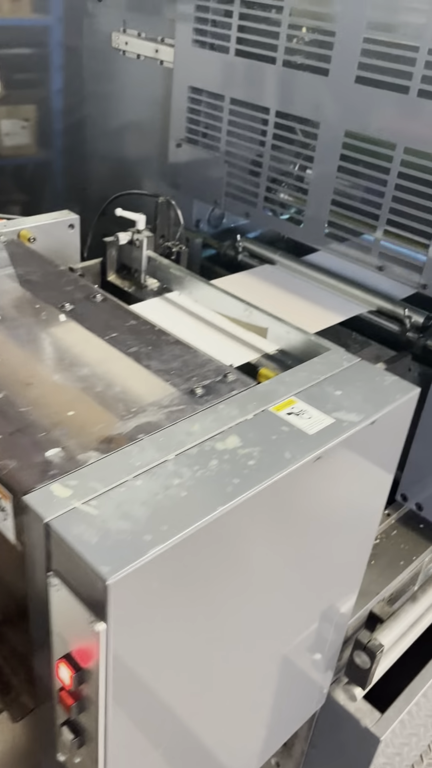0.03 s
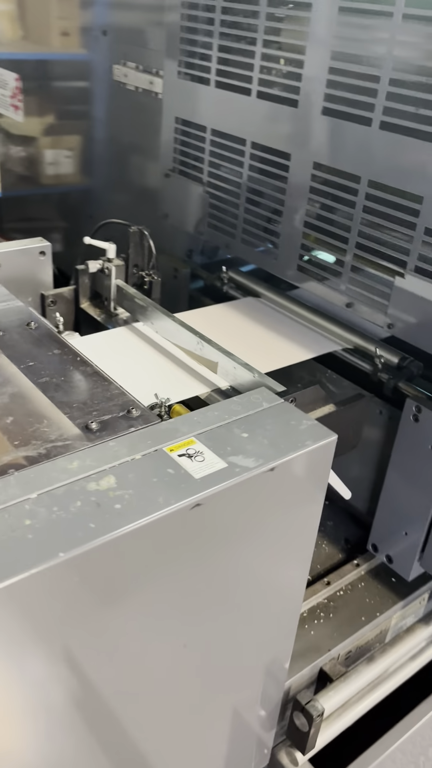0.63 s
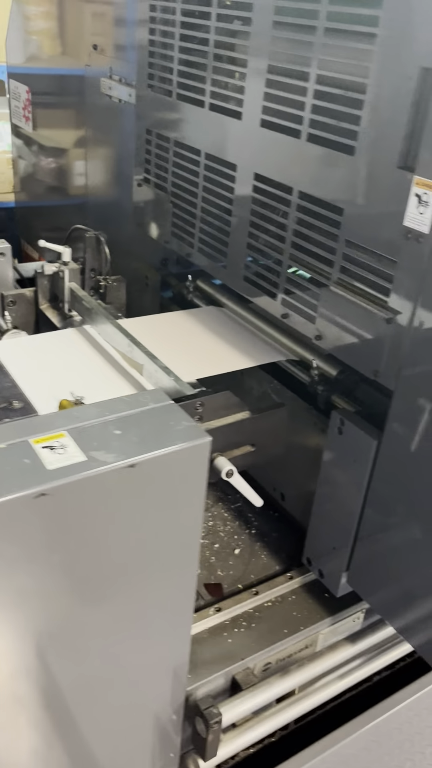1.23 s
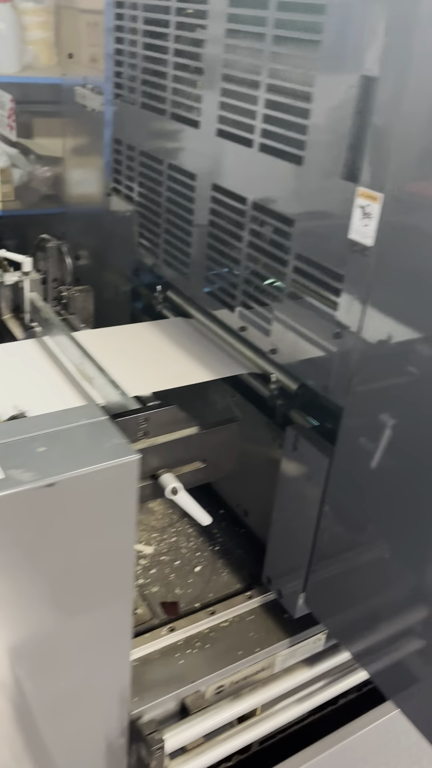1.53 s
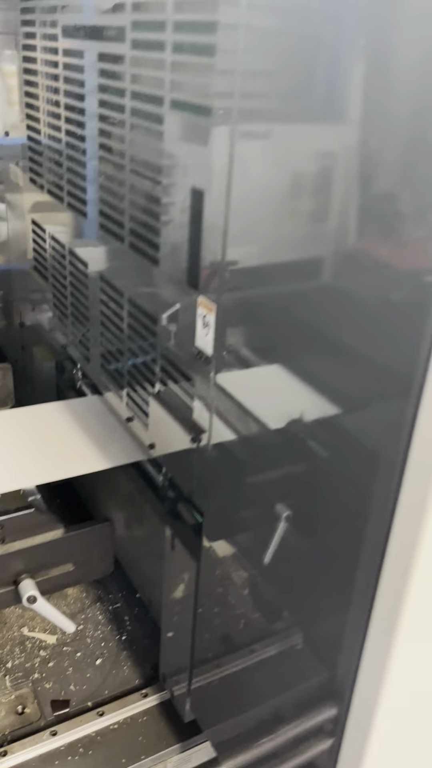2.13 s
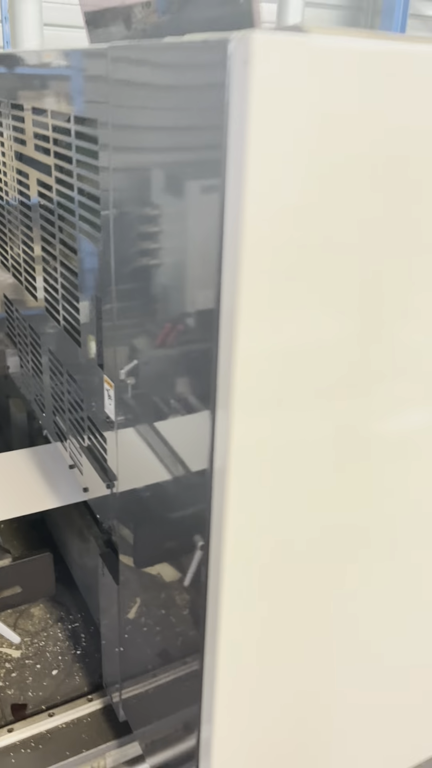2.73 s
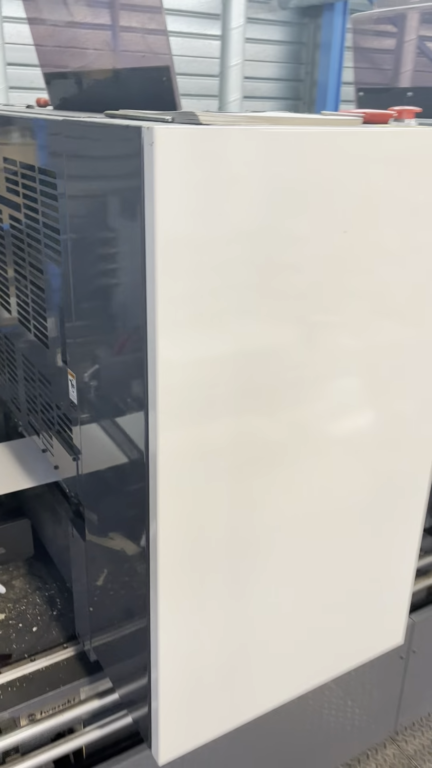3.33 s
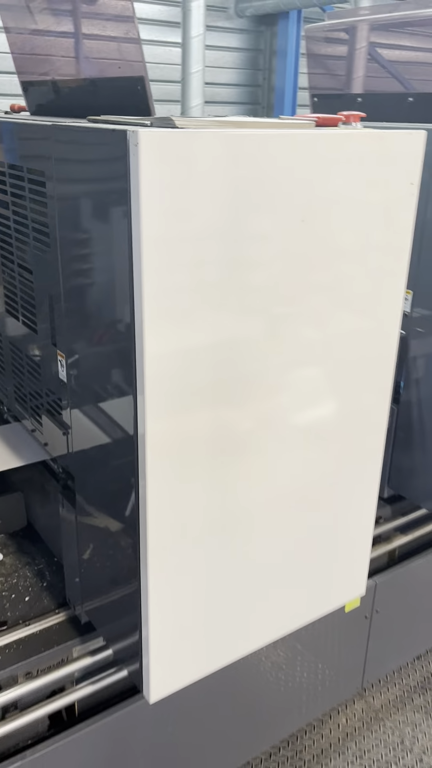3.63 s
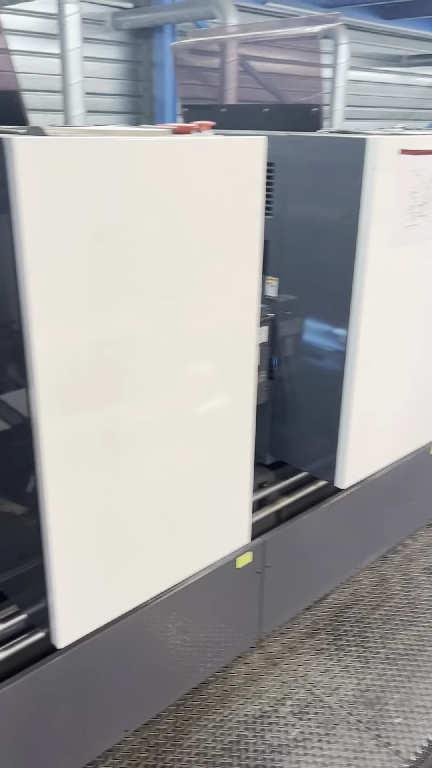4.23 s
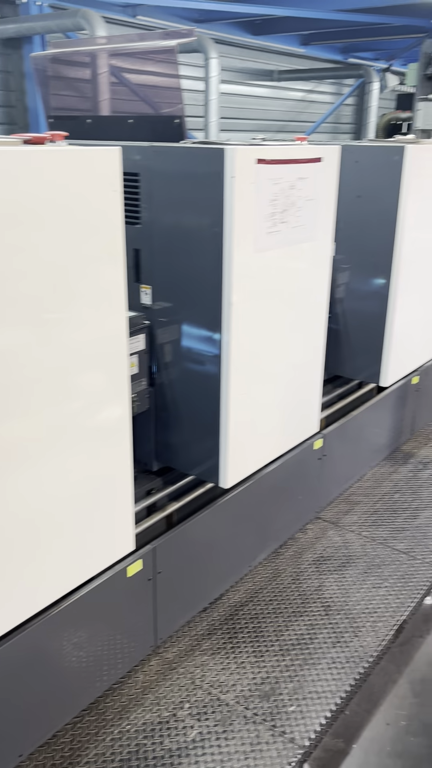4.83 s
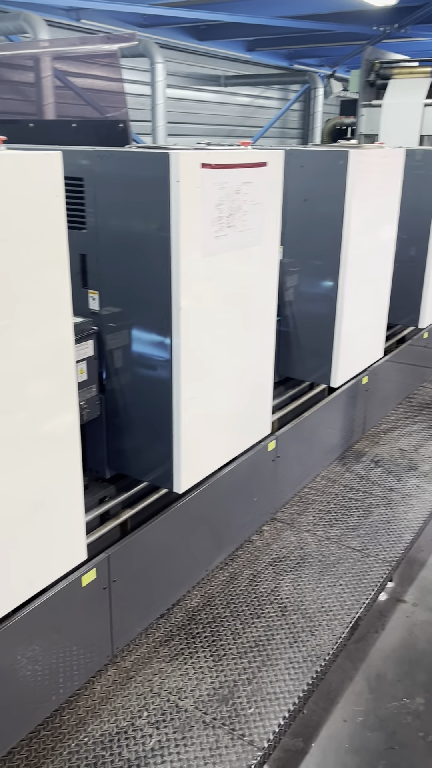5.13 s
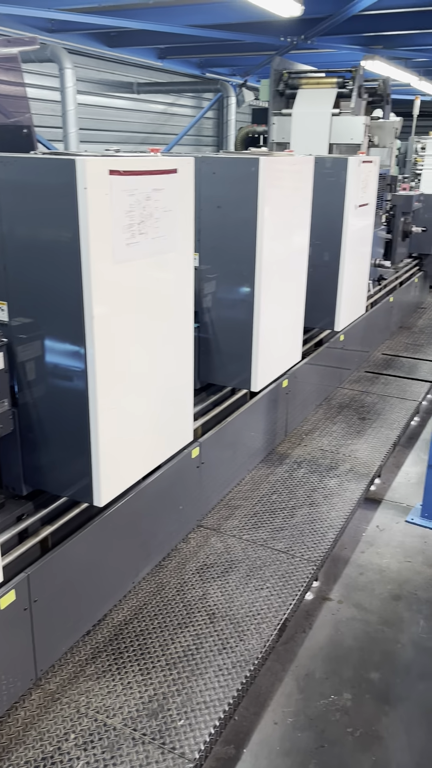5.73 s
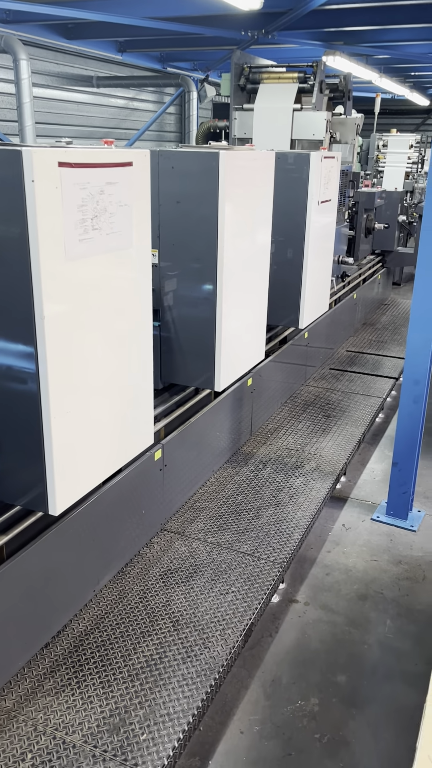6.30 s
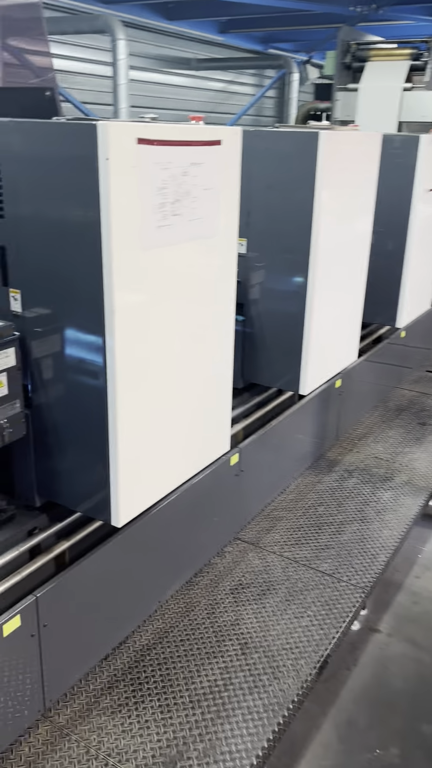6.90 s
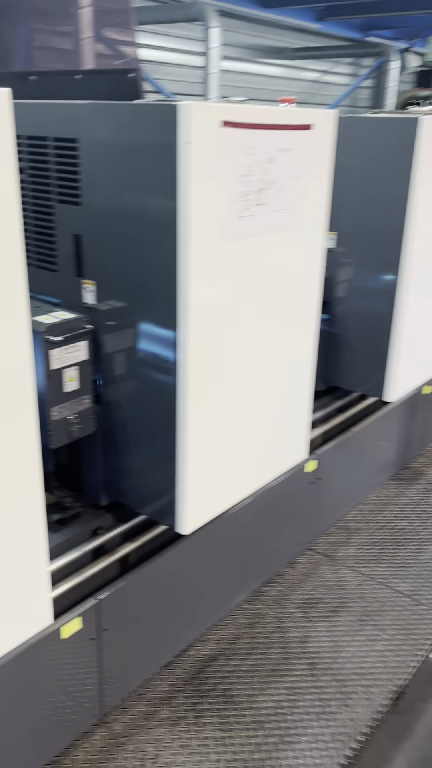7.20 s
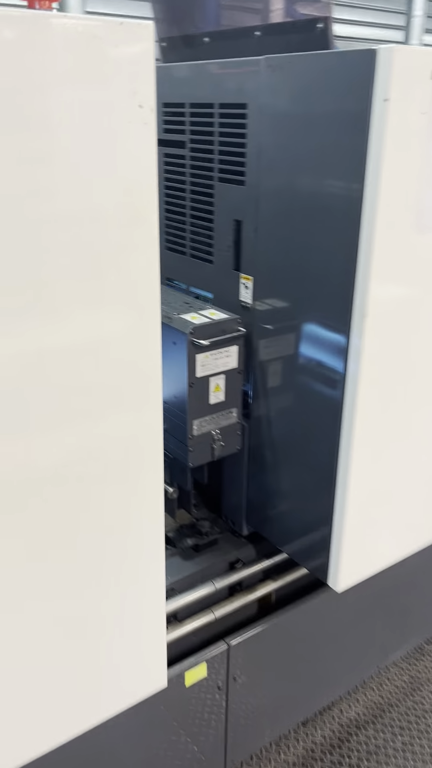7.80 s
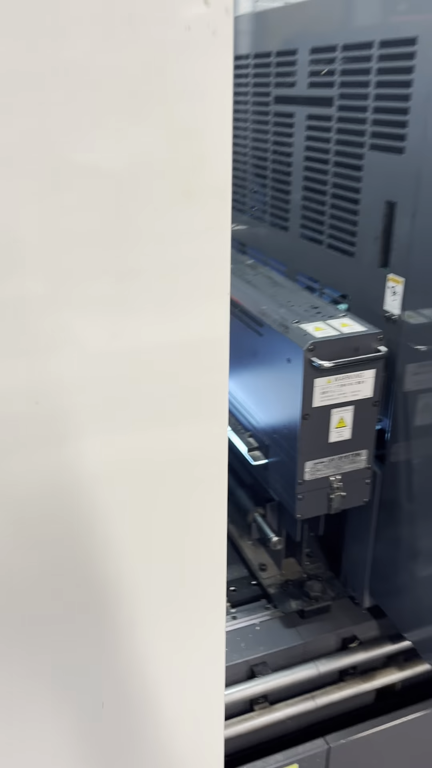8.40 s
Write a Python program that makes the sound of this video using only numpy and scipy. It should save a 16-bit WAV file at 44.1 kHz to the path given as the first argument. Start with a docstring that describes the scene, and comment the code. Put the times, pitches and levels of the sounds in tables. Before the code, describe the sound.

A large printing press runs in a hard-walled industrial hall, heard from a microphone carried along its side. Drives and blowers make a steady roar with a wavering whine, and each cycle adds a swish and two clacks. Close bursts of paper rasping and drumming are loudest at the start, around one second and just after three, with weaker ones later. Metal ticks, lever raps and dull roller knocks are scattered between them.

```python
"""A label press roars and whines in a hard-walled hall while a phone is carried along its printing units.
Drives and blowers make the roar and shake the panels, which sing as the phone passes them.
Every machine cycle brings a swish and two clacks; loose parts tick, levers rap and rollers knock.
On some strokes the web, the long strip of paper, is jerked back over its guides
and rasps and drums close by."""
import sys
import numpy as np
from scipy import signal
from scipy.fft import rfft, irfft, next_fast_len
from scipy.io import wavfile
from scipy.ndimage import uniform_filter1d

SR = 44100
rng = np.random.default_rng(int(sys.argv[2]) if len(sys.argv) > 2 else 0)


def file_out(sig):
    """Save sig as 16-bit WAV at sys.argv[1]."""
    # one column per channel
    cols = np.atleast_2d(sig).T
    # limit, then scale
    lim = np.clip(cols, -1, 1)
    pcm = np.round(lim * 32767).astype(np.int16)
    wavfile.write(sys.argv[1], SR, pcm)


N = 377055
T = np.arange(N) / SR
FFT_SIZE = next_fast_len(N)
FREQ = np.maximum(np.arange(FFT_SIZE // 2 + 1) * SR / FFT_SIZE, 1)
CYCLE_S = .75  # one machine cycle
RECEDE_DB_PER_S = 6.5  # the first unit's hiss and cam fade as the phone leaves it behind


def gain(db):
    """Turn decibels into a number to multiply by."""
    return 10 ** (np.asarray(db) / 20)


def normalise(x):
    """Scale a sound to an average power of 1."""
    return x / np.sqrt(np.mean(x ** 2))


def over_time(rows):
    """Join up a table's points in time: one curve for each later column."""
    times, *columns = np.transpose(rows)
    return [np.interp(T, times, column) for column in columns]


def over_pitch(rows):
    """Join up a table's points in frequency: one curve for each later column."""
    hz, *columns = np.transpose(rows)
    return [np.interp(np.log(FREQ), np.log(hz), column) for column in columns]


def filtered(x, response):
    """Give every frequency of a sound its own gain."""
    return irfft(rfft(x, FFT_SIZE) * response, FFT_SIZE)[..., :N]


def above(hz):
    """A filter that lets the frequencies above hz through."""
    return 1 / (1 + (hz / FREQ) ** 4)


def resonance(hz, width_hz):
    """A filter for a part that rings at one pitch."""
    return 1 / (1 + ((FREQ - hz) / width_hz * 2) ** 2)


def peaks(rows):
    """A filter that lifts or lowers several narrow bands."""
    return gain(sum(db * resonance(hz, width_hz) for hz, width_hz, db in rows))


def tiny_resonances(width_hz, depth_db):
    """Countless weak resonances of panels and hall make a slightly bumpy filter."""
    hz = np.arange(0, SR / 2, 10)
    bumps = normalise(signal.lfilter([1], [1, -np.exp(-10 / width_hz)], rng.standard_normal(len(hz))))
    return gain(depth_db * np.interp(FREQ, hz, bumps) * above(680))


def noise():
    """Two unrelated white noises: one for the direct sound, one for the sound the hall scatters."""
    return rng.standard_normal((2, N))


def coloured_noise(response):
    """Filtered noise with an average power of 1."""
    return normalise(filtered(noise(), response))


def ringing(colour, resonances=()):
    """The dense, noisy ring of a machine part."""
    return coloured_noise(gain(over_pitch(colour)[0]) * peaks(resonances))


def wander(rate_hz):
    """A smooth random drift, roughly between -1 and 1."""
    steps = rng.standard_normal(4096)
    drift = np.interp(T * rate_hz, np.arange(len(steps)), steps)
    return uniform_filter1d(drift, int(SR / rate_hz / 2)) * np.sqrt(2)


def grains(per_s, spread_db):
    """Two rows of tiny random impacts of uneven size."""
    hits = (rng.random((2, N)) < per_s / SR) * np.sign(noise())
    size_db = spread_db * np.minimum(rng.exponential(size=(2, N)), 3)
    return normalise(hits * gain(size_db))


def blows(times, levels_db, rise_s, ring_s, hall_db, hall_s):
    """Loudness of blows: a quick rise, then a ring and a hall echo that lose 60 dB in ring_s and hall_s."""
    t = T[:SR // 2]
    rise = 1 - np.exp(-t / rise_s)
    power = rise ** 2 * (gain(-60 * t / ring_s) ** 2 + gain(hall_db - 60 * t / hall_s) ** 2)
    total = np.zeros(N + len(t))
    for at_s, db in zip(times, levels_db):
        start = max(int((at_s - rise_s) * SR), 0)
        total[start:start + len(t)] += gain(db) ** 2 * power / power.max()
    return np.sqrt(total[:N])


def pulls(rows, swell_db):
    """Loudness of tugs that swell, hold and let go, plus the extra columns of the strongest tug."""
    rows = np.array(rows)
    start_s, swell_s, hold_s, fade_s, level_db = rows.T[:5, :, None]
    age_s = T - start_s
    rise_db = swell_db * np.clip(1 - age_s / swell_s, 0, 1)
    fall_db = 60 * np.maximum(age_s - swell_s - hold_s, 0) / fade_s
    each_db = np.where(age_s > 0, level_db - rise_db - fall_db, -np.inf)
    loudness = uniform_filter1d(gain(each_db.max(axis=0)), int(.006 * SR))  # soften the catch
    return loudness, *rows[each_db.argmax(axis=0), 5:].T


def each_cycle(at_s):
    """The times of something that happens once in every machine cycle."""
    return np.arange(at_s, N / SR, CYCLE_S)


# The roar along the phone's walk: time_s, rumble_db, middle_db, hiss_db
ROAR_ALONG_WALK = [(0.0, -25, -28, -34.5), (1.19, -27.5, -29, -36), (2.43, -26, -32, -38.5),
                   (3.36, -24.5, -30, -38.5), (3.76, -27.5, -33, -38.5), (6.55, -27, -33, -40),
                   (8.55, -25.5, -32, -38.5)]
def walk_db():
    """Rumble, middle and hiss rise and fall around their usual levels as the phone moves."""
    return [curve - np.median(curve) for curve in over_time(ROAR_ALONG_WALK)]


# Moments of hard work in every cycle: time_in_cycle_s, half_width_s, boost_db
DRIVE_LOADS = [(.082, 0.036, 1.5), (.245, 0.037, 0.5), (.40, 0.094, 2.5), (.69, 0.019, 1.23)]
def drive_effort_db():
    """The drives get a little louder each time they take a load."""
    from_load_s = lambda at_s: (T - at_s + CYCLE_S / 2) % CYCLE_S - CYCLE_S / 2
    return sum(db * np.exp(-(from_load_s(at_s) / width_s) ** 2) for at_s, width_s, db in DRIVE_LOADS)


# Tone colour of the drives and blowers: pitch_hz, level_db
ROAR_COLOUR = [(25, -124), (45, -65), (80, -59), (170, -53.5), (400, -53.5), (560, -56), (750, -59.5),
               (1200, -64), (1700, -67), (2400, -64.5), (3500, -71.5), (5000, -76), (9000, -84),
               (15500, -87.5)]
# Resonances of the housing: pitch_hz, width_hz, boost_db
HOUSING_RESONANCES = [(72.7, 16.7, 8), (94.9, 8.7, 10), (422.3, 24.2, 3.5), (496.4, 43, -1.5),
                      (518, 22, 2.5), (673.5, 28, 4.5), (824, 33.6, 6), (1202, 45, -2), (3720, 55, -1.5)]
def roar():
    """Rollers, gears and blowers rumble and hiss with the effort of the drives, with a fine rattle."""
    colour = gain(over_pitch(ROAR_COLOUR)[0]) * peaks(HOUSING_RESONANCES) * np.sqrt(SR / 2)
    colour *= tiny_resonances(width_hz=14, depth_db=1.3)
    rumble_db, middle_db, hiss_db = walk_db()
    effort_db = drive_effort_db()
    gear_ripple = np.sin(2 * np.pi * 14 * T / CYCLE_S)  # fourteen times a cycle
    flutter = wander(35)
    over_rumble, over_middle = above(554.6), above(2073)
    rumble = filtered(noise(), colour * (1 - over_rumble))
    rumble *= gain(rumble_db + effort_db + .84 * wander(20) - 1.46)
    middle = filtered(noise(), colour * (over_rumble - over_middle))
    middle *= gain(middle_db + .62 * effort_db + 1.014 * flutter - .16)
    rattle = normalise(noise() + .432 * grains(per_s=900, spread_db=.5))
    hiss = filtered(rattle, colour * over_middle)
    hiss *= gain(hiss_db + .39 * effort_db + 1.07 * flutter + .195 * gear_ripple - 1.34)
    return rumble + middle + hiss


# Panels and rollers, 6 dB quieter reach_s away: pitch_hz, width_hz, passed_at_s, reach_s, level_db
SINGING_PANELS = [(433.5, 48.5, 2.16, 0.36, -34), (324.5, 50, 3.35, 0.25, -34), (868, 102, 3.35, .5, -43),
                  (1057, 60, 4.06, 0.87, -43.5), (2027.6, 11.8, 5.87, 1.12, -47.5),
                  (2358, 34, 5.91, 0.96, -47.5), (536.6, 27.5, 7.31, .5, -37.5),
                  (673.5, 32.6, 7.64, 0.68, -38), (408.6, 32, 7.53, 0.04, -38.5),
                  (193.1, 12.6, 8.05, 0.5, -37.5)]
def panels():
    """Each unit's panels and rollers sing at their own pitch, swelling and fading as the phone passes."""
    shaking = noise()
    sound = np.zeros((2, N))
    for hz, width_hz, passed_at_s, reach_s, db in SINGING_PANELS:
        nearness = 1 / (1 + ((T - passed_at_s) / reach_s) ** 2)
        sound += normalise(filtered(shaking, resonance(hz, width_hz))) * gain(db) * nearness
    return sound


def tone(hz, db, fade_db, waver_hz):
    """A wavering tone that swells and fades as the phone crosses the hall's standing waves."""
    phase = 2 * np.pi * np.cumsum(hz + waver_hz * wander(12)) / SR
    rows = [np.sin(phase + wander(.37)) * gain(db + fade_db * wander(5.5)) for _ in range(2)]
    return np.sqrt(2) * np.array(rows)


# Loudness of the servo motor's whine and of the blower's blades: time_s, level_db
SERVO_LEVELS = [(0, -46), (.55, -42), (.85, -32.5), (1.15, -43), (1.35, -42), (1.55, -37.5), (1.78, -35.7),
                (2.0, -38), (2.55, -37), (2.82, -56), (3.05, -38), (3.3, -39.5), (3.55, -47), (3.92, -54),
                (4.12, -44), (5.6, -41), (6.2, -45), (6.4, -53), (6.7, -42), (7.45, -45), (8.0, -42),
                (8.12, -36), (8.4, -35.5), (8.54, -49)]
BLOWER_LEVELS = [(0, -37), (.75, -48), (1.3, -39), (1.7, -46), (1.87, -37), (2.45, -37), (2.7, -43),
                 (3.6, -34.5), (4.0, -38), (4.25, -49), (6.55, -49), (6.95, -39), (8.0, -42.5), (8.55, -49)]
# Faint tones of the motors and their power supplies: pitch_hz, level_db
FAINT_TONES = [(818, -52), (2035, -54), (8005, -71), (12274, -76)]
def motors():
    """The servo motor whines, the blower's blades hum and fainter tones sound along."""
    whine = tone(hz=1400, db=over_time(SERVO_LEVELS)[0], fade_db=.8, waver_hz=.5)
    blower = tone(hz=731.5, db=over_time(BLOWER_LEVELS)[0], fade_db=2, waver_hz=2.4)
    faint = sum(tone(hz, db, fade_db=1.8, waver_hz=3) for hz, db in FAINT_TONES)
    return whine + blower + faint


def cover_boom():
    """The drives shake the first unit's cover; it booms with each cycle and fades as it is left behind."""
    level_db = -29.5 - 4 * T + 3.5 * np.cos(2 * np.pi * T / CYCLE_S)
    return coloured_noise(resonance(hz=152, width_hz=34)) * gain(level_db)


def paper_hiss():
    """Paper hisses through the open first unit and fades as it is left behind."""
    hiss = coloured_noise(above(5974) * (1 - above(13800)))
    return hiss * gain(-49 - RECEDE_DB_PER_S * T + 3.5 * wander(25.5))


# Tone colour of the swish: pitch_hz, level_db
SWISH_COLOUR = [(500, -20), (1500, -4), (3500, 0), (5500, -3), (8000, -9), (15000, -18)]
def swishes():
    """A swish opens each cycle, louder where the nearest unit hisses more."""
    times = each_cycle(at_s=.0369)
    hiss_db = np.interp(times, T, walk_db()[2])
    loudness = blows(times, -36 + .73 * hiss_db, rise_s=.0065, ring_s=.08, hall_db=-25, hall_s=.234)
    return loudness * ringing(SWISH_COLOUR)


# Clacks of the cylinders, and the sharp snaps that open the first three swishes: start_s, body_db, snap_db
CLACKS_AND_SNAPS = [(0.054, -25.5, -31), (0.563, -30.5, -41), (0.781, -28.5, -34.5), (1.313, -30.5, -39.5),
                    (1.535, -28.5, -47.5), (1.849, -35, -46.5), (2.061, -38.5, -37), (2.599, -35.5, -45.5),
                    (2.812, -30.5, -36.5), (3.349, -27.5, -42), (3.566, -29, -38.5), (4.099, -27.5, -37.5),
                    (4.313, -33, -38.5), (4.850, -28, -35.5), (5.063, -34, -38.5), (5.600, -29.5, -35),
                    (5.814, -35, -35), (6.351, -30.5, -35.5), (6.565, -34.5, -39.5), (7.1, -30, -32.5),
                    (7.313, -34, -35.5), (7.849, -30.5, -31.5), (8.062, -42.5, -36)]
# Tone colour of a clack's body: pitch_hz, level_db
CLACK_COLOUR = [(300, -22), (1000, 8.5), (3000, 14), (5000, 13), (8000, 8), (15000, -55)]
def clacks(rebound_s=.0194, rebound_db=-11.5):
    """The cylinders clack with a bright snap and bounce back once; the first swishes open with such a snap as
    well."""
    hits = np.array(CLACKS_AND_SNAPS)
    rebounds = hits + [rebound_s, rebound_db, rebound_db]
    times, body_db, snap_db = np.vstack([hits, rebounds]).T
    body = blows(times, body_db, rise_s=.00154, ring_s=.0199, hall_db=-7.5, hall_s=.134)
    snap = blows(times, snap_db, rise_s=.0018, ring_s=.0357, hall_db=-13.5, hall_s=.18)
    return body * ringing(CLACK_COLOUR) + snap * coloured_noise(above(4200) * (1 - above(18800)))


# Jerks on the tight paper: start_s, swell_s, hold_s, fade_s, level_db, pitch_hz, octave_below_db
PAPER_JERKS = [(0.058, 0.008, 0.035, 0.1, -25.5, 284.7, 2),
               (0.175, 0.0444, 0.048, 0.12, -13.5, 282.4, -4.5),
               (0.3, 0.0089, 0.018, 0.07, -14.5, 284.4, 1.5), (0.9, 0.01, 0.05, 0.2, -25.5, 277.8, -2.5),
               (0.975, 0.0319, 0.06, 0.06, -18, 264.1, -3), (2.166, 0.0067, .014, 0.1, -20.5, 215, -21.5),
               (3.055, 0.011, 0.022, .1, -22.5, 267.6, -12),
               (3.172, 0.012, 0.006, 0.12, -15.5, 256.8, -15.5), (3.215, 0.015, 0.03, 0.2, -20, 252.5, -15),
               (3.256, 0.014, 0.011, 0.23, -10, 265.6, -23), (5.46, 0.0513, .035, 0.24, -20, 262, -9),
               (6.97, 0.00797, 0.06, 0.2, -26, 275, -5.5), (8.381, 0.023, 0.016, 0.23, -21.5, 273.1, -13.5)]
def paper_drumming():
    """The tight stretch of paper shakes like a drumskin, with a second swing an octave below."""
    pull, pitch_hz, octave_db = pulls(PAPER_JERKS, swell_db=10)
    phase = 2 * np.pi * np.cumsum(pitch_hz + 12 * wander(90)) / SR
    drum = np.sin(phase) * gain(1.4 * wander(60))
    octave_below = gain(octave_db + 2 * wander(30)) * np.sin(phase / 2 + .4 * wander(50))
    return pull * (drum + octave_below) * np.array([[1], [0]])  # so close that all of it is direct


# Strokes that drag the paper over its guides: start_s, swell_s, hold_s, fade_s, level_db, ring_hz
RASP_STROKES = [(0.076, 0.00298, 0.0126, 0.202, -18.5, 1499), (0.148, 0.02505, 0.0553, 0.3, -17.5, 1400),
                (0.232, 0.02801, 0.016, 0.3499, -13.5, 1350), (0.303, 0.01187, 0.014984, 0.06, -14, 1560),
                (.856, .004, .04, .3, -21.5, 1248), (.875, 0.125, 0.0547, 0.088, -16, 1150),
                (2.165, 0.00748, 0.017, 0.092, -31, 750), (3.073, 0.019, 0.00394, .06, -24.5, 1397),
                (3.16, 0.014, 0.048, 0.3, -26.5, 861), (3.222, 0.0143, 0.032, 0.36, -18.5, 860),
                (3.348, 0.0086, 0.05, 0.25, -31, 800), (5.32, 0.086, .08, 0.3, -27, 1460),
                (5.46, 0.0657, 0.0246, 0.24, -21.5, 1200), (6.935, 0.072, 0.0363, 0.28, -23, 1050),
                (8.312, 0.013, 0.0633, .3, -30.5, 946)]
# Tone colour of the scraping paper: pitch_hz, level_db
RASP_COLOUR = [(60, -46), (150, 9), (340, -1), (600, 3.5), (800, 7), (1500, 5.5), (2200, -1.5), (3000, 0),
               (4000, -16), (5200, -14), (8000, -23.5), (15000, -44.5)]
# Resonances of the guides in the open first unit and in the closed units: pitch_hz, width_hz, boost_db
OPEN_UNIT_GUIDES = [(424.7, 19, 13.5), (749.5, 37.6, 8.5), (841, 19.3, 3), (1193, 14, 12.5),
                    (1409, 38, 4.5), (1477, 26, 6), (1583, 38, 9.5), (1818, 86, 6.5), (2199, 98.5, 4.5),
                    (2370, 86, 4.5), (2900, 120, -1), (3343, 152, 6.5), (3782, 223, 11)]
CLOSED_UNIT_GUIDES = [(442, 49, 5), (793, 122, 4), (1020, 100, 5.3), (1370, 48, 4.1), (1720, 89, 2.44),
                      (2053, 148, 7), (3420, 196, 9.5)]
def paper_rasp(closed_from_s=2.6, ring_db=-7):
    """Paper slaps and scrapes over its guides, and each stroke sets one of them ringing most."""
    pull, ring_hz = pulls(RASP_STROKES, swell_db=8)
    # the sheet slaps at uneven moments, each time with its own force, and scrapes until the next
    slap_count = np.cumsum(115 * gain(3.5 * wander(130))) / SR
    force_db = rng.uniform(-2.5, 2.5, N // 100)[slap_count.astype(int)]
    slips = grains(per_s=7000, spread_db=1.5) * gain(force_db - 8 * (slap_count % 1))
    colour = gain(over_pitch(RASP_COLOUR)[0]) * tiny_resonances(width_hz=20, depth_db=1)
    open_rasp = normalise(filtered(slips, colour * peaks(OPEN_UNIT_GUIDES)))
    closed_rasp = normalise(filtered(slips, colour * peaks(CLOSED_UNIT_GUIDES)))
    rasp = np.where(T < closed_from_s, open_rasp, closed_rasp)
    # multiplying by a sine moves the slow part of the slips up to the guide's pitch
    slow_slips = filtered(slips, resonance(hz=0, width_hz=380))
    ring = normalise(slow_slips * np.sin(2 * np.pi * np.cumsum(ring_hz) / SR))
    return pull * (rasp + gain(ring_db) * ring) * np.array([[1], [.6]])  # close by: less scattered sound


# Ticks of loose metal parts: start_s, level_db
LOOSE_TICKS = [(0.361, -17.5), (0.394, -25.5), (1.0321, -24), (1.137, -23.5), (1.1654, -29.5),
               (1.8793, -25), (1.9144, -30), (2.1225, -31), (2.653, -25.5), (5.531, -31), (7.026, -27)]
# Their tone colour: pitch_hz, level_db
TICK_COLOUR = [(400, -16), (1400, 4), (2900, 6), (4000, 1), (5300, 4.5), (8000, -10.5), (15000, -37.5)]
# Their resonances: pitch_hz, width_hz, boost_db
TICK_RESONANCES = [(2840, 170, 5), (3750, 250, 6.5), (5370, 300, -5)]
def ticks():
    """Loose metal parts tick and ring on briefly in the hall."""
    times, levels_db = np.transpose(LOOSE_TICKS)
    loudness = blows(times, levels_db, rise_s=.0009, ring_s=.03, hall_db=-10, hall_s=.15)
    return loudness * ringing(TICK_COLOUR, TICK_RESONANCES)


# Levers striking the frame: start_s, level_db, pitch_hz, width_hz
LEVER_RAPS = [(0.913, -18, 1350, 2000), (3.809, -25.5, 1200, 2400), (5.749, -22.5, 860, 300),
              (5.773, -27.5, 830, 400), (6.379, -24.5, 900, 1600)]
def raps(cam_db=-18.5, cam_hz=1450, cam_width_hz=2400):
    """The first unit's cam raps once a cycle and levers hit the frame; each rings at its own pitch."""
    cam_times = each_cycle(at_s=.662)
    parts = [(cam_times, cam_db - RECEDE_DB_PER_S * cam_times, cam_hz, cam_width_hz)]
    parts += [([at_s], [db], hz, width_hz) for at_s, db, hz, width_hz in LEVER_RAPS]
    shaking = noise()
    sound = np.zeros((2, N))
    for times, levels_db, hz, width_hz in parts:
        ring = normalise(filtered(shaking, resonance(hz, width_hz) ** 2))
        sound += ring * blows(times, levels_db, rise_s=.001, ring_s=.07, hall_db=-18, hall_s=.2)
    return sound


# Stray knocks of the rollers: start_s, level_db
ROLLER_KNOCKS = [(0.692, -22), (0.911, -19.5), (1.43, -24), (1.543, -21.5), (1.879, -22), (2.3, -25.5),
                 (2.174, -18.5)]
# Their tone colour: pitch_hz, level_db
KNOCK_COLOUR = [(90, -12.5), (220, 18), (500, -2), (800, 5.5), (1500, -4.5), (2200, -12), (3200, -19),
                (8000, -32.5)]
def knocks():
    """The rollers give a few dull knocks that echo in the hall."""
    times, levels_db = np.transpose(ROLLER_KNOCKS)
    loudness = blows(times, levels_db, rise_s=.001, ring_s=.1, hall_db=-18, hall_s=.29)
    return loudness * ringing(KNOCK_COLOUR)


# How the phone's two microphones compare: pitch_hz, likeness_0_to_1, left_minus_right_db
MICROPHONES = [(80, 1, -0.5), (302, 0.98, -2), (624, 0.58, -3.5), (920, 0.71, -1), (1486, 0.42, -1.5),
               (3110, 0.65, -0.5), (4250, 0.23, -1), (4990, 0, -4.5), (5555, 1, 0.5), (15000, 1, -0.5)]
def scene():
    """Both microphones share the direct sound; the scattered sound makes left and right differ."""
    running = roar() + panels() + motors() + cover_boom() + paper_hiss()
    strokes = swishes() + clacks() + paper_drumming() + paper_rasp() + ticks() + raps() + knocks()
    direct, scattered = running + strokes
    likeness = np.clip(over_pitch(MICROPHONES)[0], 0, .999 - .025 * above(3000))
    mid = filtered(direct, np.sqrt((1 + likeness) / 2))
    side = filtered(scattered, np.sqrt((1 - likeness) / 2))
    return np.array([mid + side, mid - side])


# How far the wave at the left microphone is ahead: pitch_hz, lead_cycles
LEFT_LEAD = [(0, -.01), (450, -.04), (1000, .06), (1700, .03), (2200, .18), (2650, .4), (3300, .41),
             (4100, .21), (5000, .25), (6000, .5), (8050, 1), (10250, 1.5), (12400, 2), (16000, 2.81)]
# Balance as the phone turns: time_s, left_minus_right_db
TURNING_BALANCE = [(0, -0.31), (3.3, 0), (5.4, 0.5), (7.8, 0.5)]
def record(dry, ceiling=.88, top_hz=15650):
    """The two microphones differ in level and timing."""
    lead_cycles = np.interp(FREQ, *np.transpose(LEFT_LEAD))
    left = gain(over_pitch(MICROPHONES)[1] / 2) * np.exp(1j * np.pi * lead_cycles)
    heard = filtered(dry, np.array([left, 1 / left]))
    # the press stands to the right, less so while the phone looks down the aisle
    turn_db = over_time(TURNING_BALANCE)[0]
    heard *= gain(np.array([turn_db, -turn_db]) / 2)
    # the loudest peaks are softly rounded and the top treble is cut
    rounded = heard / (1 + (heard / ceiling) ** 8) ** (1 / 8)
    return signal.sosfilt(signal.ellip(10, .2, 80, top_hz, fs=SR, output="sos"), rounded)


dry = scene()
out = record(dry)
file_out(out)
```